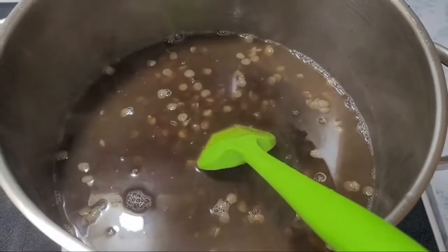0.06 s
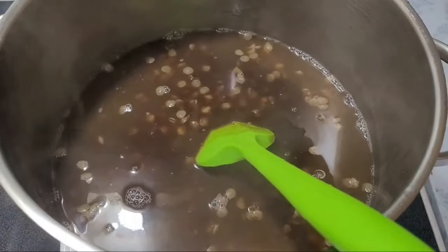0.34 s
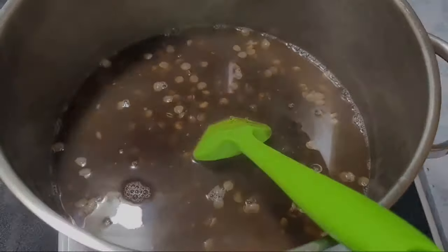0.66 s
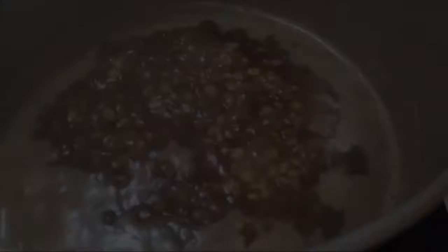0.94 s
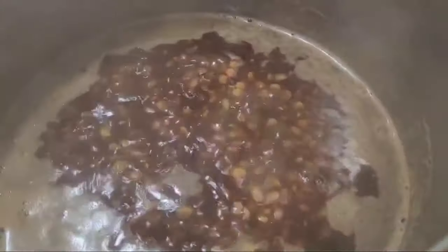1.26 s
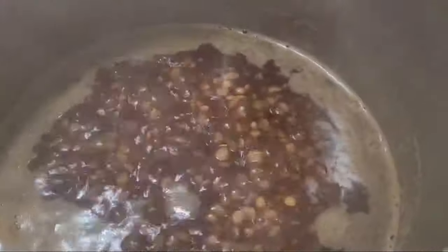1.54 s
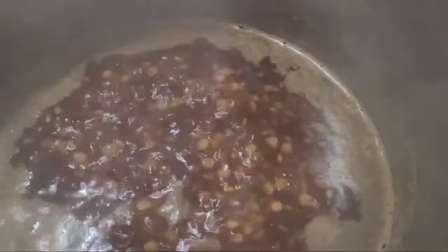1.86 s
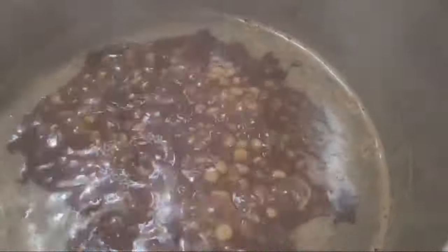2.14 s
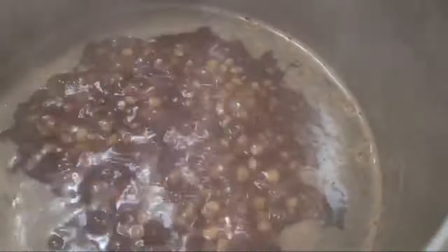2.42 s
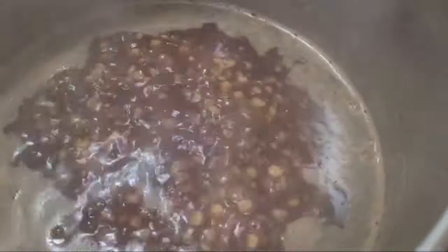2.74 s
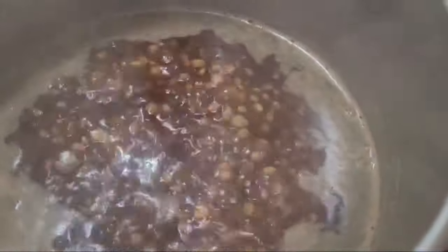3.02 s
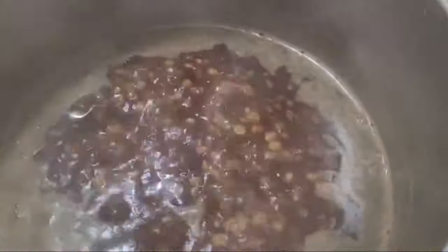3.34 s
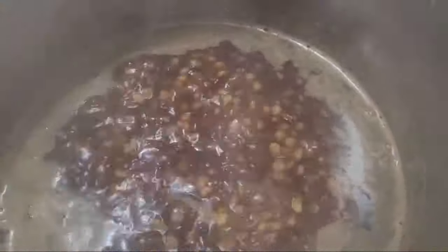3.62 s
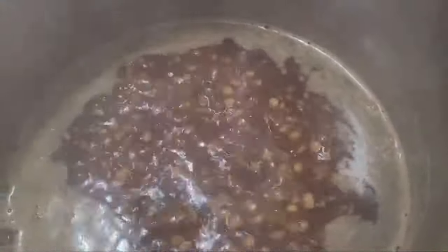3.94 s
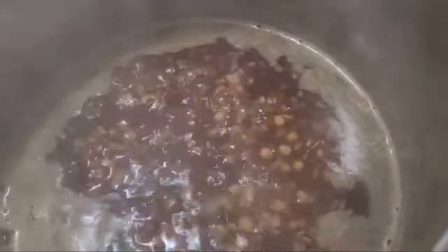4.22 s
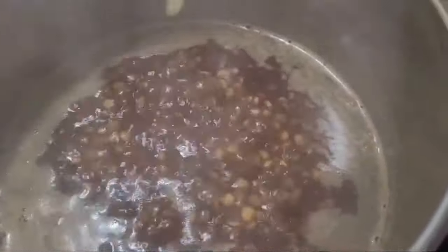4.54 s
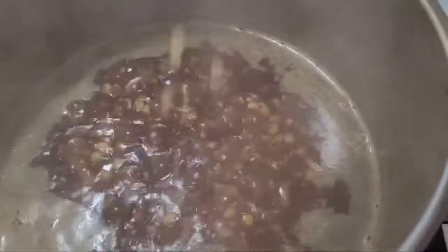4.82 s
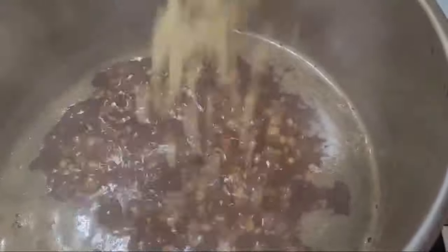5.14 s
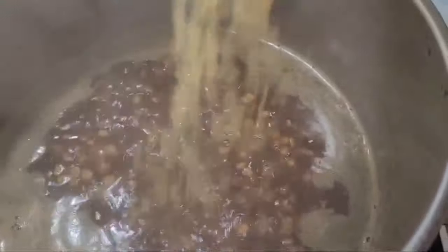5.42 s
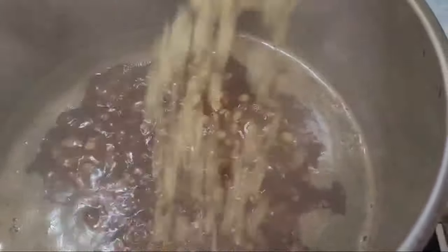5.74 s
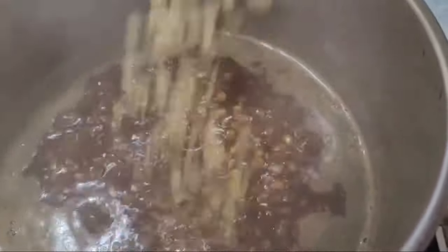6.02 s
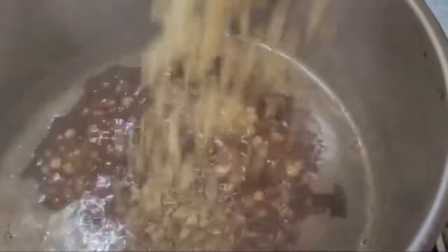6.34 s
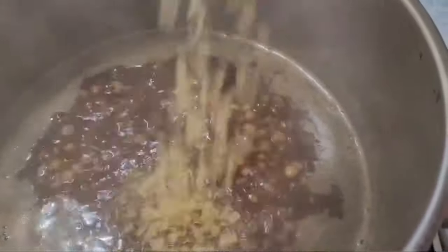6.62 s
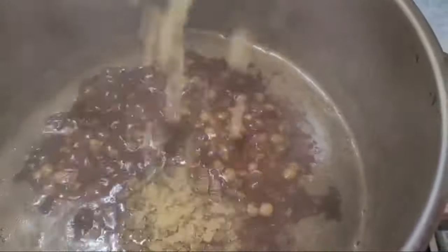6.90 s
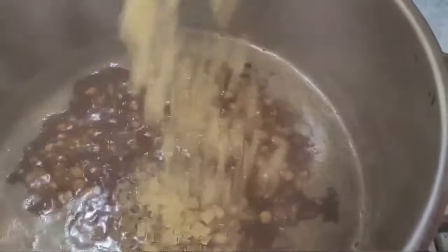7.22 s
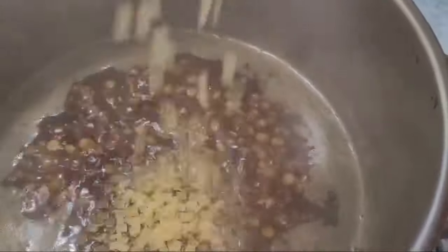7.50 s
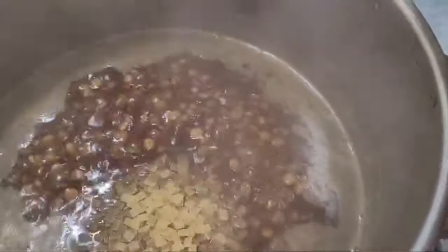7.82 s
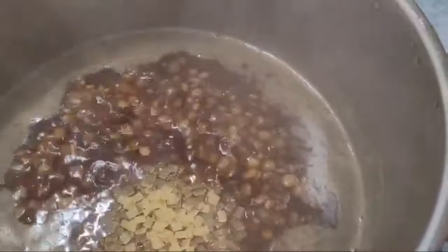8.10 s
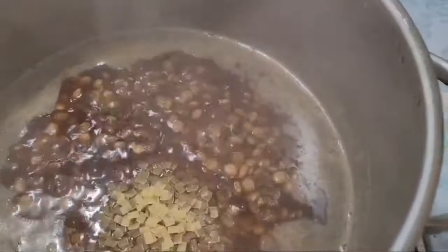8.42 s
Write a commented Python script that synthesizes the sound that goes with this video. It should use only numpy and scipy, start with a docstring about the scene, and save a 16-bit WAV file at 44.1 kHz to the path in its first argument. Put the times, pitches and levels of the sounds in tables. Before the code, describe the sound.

It begins very quietly with the low rush of a kitchen burner and one faint rustle, then drops to silence at about 0.6 seconds. From 1 second, lentil soup boils thickly in a deep steel pot, heard close above the rim in stereo. Irregular plops, small snaps and gurgles ring hollowly in the pot over a low rumble and continue throughout. Two short knocks on the steel come at about 2.2 and 2.4 seconds, the first sharper. Soup spits faintly on the hot wall near 1.6 and 3 seconds. From about 3.7 seconds dry pasta slides softly in its packet with scattered ticks. At 5 seconds it pours in with a bright, surging hiss of tiny collisions, single pieces clicking on the steel. The pour thins after 7.3 seconds and trickles out by 7.9, leaving the bubbling and a light sizzle until about 8.5 seconds.

```python
"""Lentil soup boiling in a deep steel pot on a kitchen stove, stereo microphone just above the rim.
After a quiet moment and a short silence, bubbles burst thickly and ring the air in the pot.
Soup sizzles on the hot wall and the steel is knocked twice. Dry pasta slides in its packet,
pours in with a hissy rush of tiny collisions, and trickles out. The burner rushes low underneath."""
import sys
import numpy as np
from scipy import signal
from scipy.fft import rfft, irfft
from scipy.io import wavfile
from scipy.ndimage import uniform_filter1d

SR = 44100
rng = np.random.default_rng(int(sys.argv[2]) if len(sys.argv) > 2 else 0)


def unload_audio(sound):
    """Save the sound as a 16-bit wav file, at the path given as the first command line argument."""
    columns = np.transpose(np.atleast_2d(sound))
    # keep every value between -1 and 1, then stretch to whole-number steps
    steps = np.round(np.clip(columns, -1, 1) * 32767)
    wavfile.write(sys.argv[1], SR, steps.astype(np.int16))


N = 373086
T = np.arange(N) / SR

# Levels in the tables are relative, ahead of the filters and the microphone.
# the biggest bursts: (time [s], plop level [dB], plop pitch [Hz], film snap level [dB])
BIG_BURSTS = [(1.039, -45, 640, -45), (1.084, -40, 600, -44), (1.24, -30.5, 874, -42),
              (1.451, -31.5, 660, -52), (1.524, -34.5, 765, -40.5), (1.627, -33.5, 634, -32.5),
              (1.652, -24, 685, -37.5), (1.729, -29, 616, -49), (1.792, -29.5, 468, -64),
              (1.812, -39, 504, -56), (1.925, -22.5, 660, -59), (1.935, -31, 900, -55),
              (2.053, -32, 556, -51), (1.972, -22.5, 600, -36.5), (2.102, -33, 630, -35.5),
              (2.193, -27.5, 780, -34), (2.243, -26, 483, -41), (2.307, -30.5, 590, -50),
              (2.318, -29.5, 616, -29), (2.35, -33, 700, -39), (2.382, -23.5, 684, -44),
              (2.51, -30, 534, -65), (2.524, -20, 680, -44), (2.547, -38, 845, -43),
              (2.574, -23, 794, -30.5), (2.842, -34.5, 834, -49), (3.058, -36, 880, -44.5),
              (3.124, -29, 734, -46), (3.142, -32.5, 577, -39), (3.171, -34, 870, -34.5),
              (3.388, -26, 603, -41), (3.402, -23.5, 850, -37), (3.444, -35, 580, -46),
              (3.529, -26, 785, -32.5), (3.722, -30.5, 507, -70), (3.747, -30, 544, -58),
              (3.899, -36, 630, -64), (3.92, -32, 460, -63), (4.033, -30, 490, -70),
              (4.112, -19.5, 840, -33.5), (4.136, -30, 686, -52), (4.175, -29.5, 646, -31.5),
              (4.267, -30.5, 514, -53), (4.307, -25.5, 706, -56), (4.428, -35, 730, -56),
              (4.452, -53, 1100, -41), (4.55, -32, 660, -34), (4.63, -40, 900, -47),
              (4.71, -25.5, 750, -55), (4.74, -28.5, 553, -42), (4.844, -42, 1110, -43),
              (4.863, -36, 800, -46), (4.89, -29, 770, -32), (4.916, -27, 585, -50), (4.931, -32, 623, -44),
              (4.964, -29.5, 620, -46), (5.02, -21, 765, -28.5), (5.074, -28.5, 494, -33.5),
              (5.188, -31.5, 590, -32), (5.207, -31, 800, -37), (5.226, -38, 600, -34),
              (5.333, -25.5, 644, -57), (5.39, -35, 1130, -33), (5.438, -33, 620, -38),
              (5.737, -38, 724, -32.5), (5.751, -29, 520, -44), (5.788, -29.5, 870, -24.5),
              (5.809, -27, 664, -52), (5.83, -32, 750, -45), (5.9, -29, 885, -43), (5.933, -34, 730, -41),
              (6.114, -30.5, 465, -39), (6.12, -31.5, 740, -37), (6.176, -32, 1120, -39),
              (6.382, -25.5, 724, -61), (6.589, -37, 483, -56), (6.694, -27.5, 635, -41.5),
              (6.736, -34, 570, -53), (6.748, -29.5, 710, -57), (6.94, -35.5, 790, -42.5),
              (7.007, -27.5, 560, -44), (7.059, -35, 690, -45), (7.111, -24.5, 750, -48),
              (7.115, -21, 700, -40), (7.369, -19.5, 780, -29), (7.4975, -32, 780, -52),
              (7.503, -27, 1390, -34), (7.522, -32, 513, -52), (7.596, -29.5, 560, -40.5),
              (7.706, -34, 910, -71), (7.81, -30, 600, -50), (7.89, -27, 740, -45),
              (7.964, -36, 600, -42.5), (8.029, -30.5, 614, -36), (8.06, -24, 800, -71),
              (8.132, -30.5, 543, -40.5), (8.206, -29, 620, -49), (8.215, -29, 730, -28),
              (8.373, -28.5, 700, -62), (8.399, -30, 506, -61), (8.45, -30.5, 756, -28.5)]
# strength of the boil, which builds up and then holds: (time [s], level [dB])
BOIL_LEVEL = [(0, -75.5), (.9, -73), (.98, -49.5), (1.17, -51.5), (1.6, -46.5), (3.6, -46.5), (5.3, -43.5),
              (7.4, -45.5), (7.85, -48), (8.46, -45.5)]
# rumble of the heaving soup: (frequency [Hz], level [dB])
RUMBLE_COLOUR = [(25, -18), (45, -12), (62, 0.5), (80, -3.5), (115, -7.5), (160, -10), (200, -20.5),
                 (300, -21), (600, -35), (3000, -98)]
# modes of the air in the pot: (frequency [Hz], level over the direct sound [dB], t60 [s])
AIR_MODES = [(119.1, 9, 0.27), (156.3, 3.5, 0.082), (282.3, 5.5, 0.075), (311.8, 1.5, 0.073),
             (408, 2, 0.066), (458.4, 2, 0.035), (511.5, 6, 0.055), (640, -2, 0.069), (1109, 3.5, 0.04),
             (1444, -1.5, 0.029), (1640, 2.5, 0.055), (2010, 5.5, 0.06)]
# hollows between those modes: (frequency [Hz], level [dB])
POT_HOLLOWS = [(155, -0.5), (195, -2), (250, 3.5), (305, 0), (345, -3.5), (400, 2), (650, -2.5), (830, -3),
               (1100, -1), (2300, 3.5), (3100, 13)]
# pasta slides, pours in surges, slackens, pours again and trickles out: (time [s], level [dB])
PASTA_FLOW = [(3.68, -59), (3.77, -67), (4.0, -68), (4.14, -57), (4.29, -62), (4.34, -64.5), (4.43, -59),
              (4.68, -62), (4.8, -56), (4.96, -56), (5.02, -42), (5.15, -39), (5.19, -45), (5.27, -39.5),
              (5.44, -38), (5.485, -44), (5.53, -33), (5.6, -42), (5.645, -37.5), (5.69, -43), (5.77, -38),
              (5.88, -39.5), (5.95, -34), (6.16, -38), (6.3, -36.5), (6.39, -34), (6.47, -46.5),
              (6.62, -43), (6.83, -48.5), (6.885, -36.5), (6.93, -43.5), (7.01, -36), (7.13, -39),
              (7.17, -33), (7.23, -41), (7.3, -40.5), (7.42, -53.5), (7.54, -49), (7.68, -53.5),
              (7.73, -59.5), (7.88, -74)]
# hiss of the pasta stream: (frequency [Hz], level [dB])
RUSH_COLOUR = [(2000, -14), (3200, -39.5), (4200, 8), (5000, 0), (5600, 5), (7400, -12), (8800, 7.5),
               (10000, 12.5), (11300, 13.5), (13000, 14), (15500, 13.5)]
# clatter of scattered pieces: (frequency [Hz], level [dB])
CLATTER_COLOUR = [(600, -12), (1300, -9), (1750, -11), (2010, -4), (2300, -6), (3150, -3), (3700, 9),
                  (4150, 13.5), (4750, 11), (4980, 14), (5600, 6), (6000, 8), (7400, 13), (9000, 0),
                  (15000, -25)]
# a light touch and two knocks on the pot: (time [s], level [dB], contact time [ms])
POT_KNOCKS = [(.587, -46, .4), (2.1985, -14, 0.013), (2.362, -18, 0.2)]
# modes of the steel wall: (frequency [Hz], level [dB], t60 [s])
STEEL_MODES = [(442, 2, 0.053), (1100, -19, 0.036), (1280, -14, 0.07), (1965, -7, 0.055),
               (2062, -10.5, 0.08), (2230, -7, .035), (2387, -6, 0.06), (2600, -11, .035), (3130, -3, .03),
               (3420, -8, 0.03), (3607, -5, .05), (3715, 1, 0.065), (4250, -10, 0.06), (5880, -2, 0.05),
               (6480, 1, 0.035), (6640, -3, .035), (6850, -4, 0.03), (7560, -10, .045), (7740, -4, 0.06),
               (10370, -17, .06), (10750, -14, 0.06), (11250, -20, .05), (11980, -22, 0.05)]
# droplets, a hard touch and single pasta pieces on the steel: (time [s], level [dB])
STEEL_TICKS = [(1.432, -62), (1.695, -58), (1.763, -63), (1.835, -56), (1.853, -54), (2.198, -35),
               (2.319, -54), (2.935, -60), (3.163, -59), (3.283, -56), (3.303, -65), (3.575, -60),
               (3.737, -55), (3.8005, -51), (3.816, -53), (3.9145, -53), (4.062, -46), (4.1385, -45),
               (4.302, -36.5), (4.5195, -35), (4.674, -49), (4.7795, -37), (4.8147, -42), (4.9337, -36),
               (4.975, -33), (5.035, -23), (5.132, -28), (5.558, -26), (5.645, -27), (5.764, -26),
               (5.799, -26), (6.11, -26), (6.5524, -29), (6.6564, -32), (6.7147, -28), (6.7887, -30),
               (7.113, -29), (7.258, -30), (7.2984, -28), (7.335, -31), (7.4577, -33), (7.4926, -36),
               (7.536, -30), (7.568, -31), (7.58, -32), (7.673, -39), (7.829, -50), (8.0214, -54),
               (8.215, -44), (8.237, -53)]
# spurts where soup wets the hot wall: (crest time [s], level [dB], swell time [s])
SIZZLE_SPURTS = [(1.45, -68, 0.046), (1.65, -56.5, 0.02), (2.86, -72, 0.12), (3.07, -61, 0.23),
                 (3.17, -55.5, 0.043), (7.99, -62, 0.12), (8.16, -59, 0.0063)]
# spitting on the hot wall: (frequency [Hz], level [dB])
SPIT_COLOUR = [(2000, -20), (3300, -6), (4300, 0), (4800, -5), (5400, -13), (7200, -15), (9500, -28),
               (15000, -32)]
# soft puffs of fine spray: (crest time [s], level [dB], swell time [s])
SPRAY_PUFFS = [(1.06, -77, 0.051), (1.44, -68, 0.024), (1.64, -84, 0.017), (1.975, -61, 0.023),
               (2.11, -83, 0.017), (2.52, -67, 0.39), (8.22, -54, 0.011)]
# hiss of that spray: (frequency [Hz], level [dB])
MIST_COLOUR = [(1500, -8), (2800, -2), (3800, 0), (5000, -5), (7200, -3), (9000, -16), (11000, -15),
               (15000, -18)]
# rush of the burner under the pot: (frequency [Hz], level [dB])
BURNER_COLOUR = [(25, -9), (60, -5.5), (110, 1), (190, -11.5), (275, 6), (400, -4.5), (700, -13.5),
                 (1100, -29.5), (2000, -44.5), (4500, -35), (6700, -32), (8500, -36), (15000, -47)]
# response of the two microphone ports: (frequency [Hz], left level [dB], right level [dB])
MIC_PORTS = [(47.3, 0.5, -5), (202, 0.5, -3.5), (470, -1.7, -4.5), (1097, 9, 4.5), (1700, 6.5, -9.5),
             (2140, 9.5, 3), (3420, -2, -1.5), (4400, -4.5, -8), (4970, -9, -4), (8260, -3.5, -4.5),
             (8700, -5, -4), (11650, 2, 0.5), (15500, 0.5, 0)]

CREST_S = .012  # from the start of a bubble's sound to its crest


def soup():
    """The main source, just below the microphone: every bubble sounds through the air in the pot."""
    surface = bursts(BIG_BURSTS) + bursts(middling_bursts()) + boil()
    return pot(colour(undb(-2) * surface, POT_HOLLOWS))


def bubble(hz, cycles, swell, glide):
    """A cavity opens in about a cycle, rings briefly and rises in pitch."""
    turns = (T[:SR // 25] - CREST_S) * hz
    opening = -(turns / swell) ** 2
    dying = -turns * np.tanh(3 * turns) / cycles
    envelope = np.exp(np.where(turns < 0, opening, dying))
    return envelope * np.cos(2 * np.pi * turns * (1 + glide * np.tanh(turns / 4)))


def bursts(rows, snap_hz=1580, tear_gap_s=.0031, flurry_s=.01047, flurry_db=-16.5):
    """A low plop, higher snaps as the film tears in steps, and small neighbours set off around it."""
    out = np.zeros((2, N))
    for s, db, hz, snap_db in rows:
        (length, place, _), tears, neighbours = rng.uniform(-1.098, 1, (3, 3))
        start = s - CREST_S
        plop = bubble(hz, cycles=.75 * (1 + .4 * length), swell=.72, glide=.04)
        add(out, start, undb(db - 1.4) * placed(plop, place))
        for k, tear in enumerate(tears):
            snap = bubble(snap_hz * (1 + .25 * tear), cycles=1.1, swell=1.18, glide=.037)
            delay = k * tear_gap_s * (1 + tear / 2)
            add(out, start + delay, undb(snap_db - 2 - 5 * k) * placed(snap, place))
        for order, scatter in zip((-1.25, -.75, .9), neighbours):
            small = bubble(hz * 2 ** (.5 * scatter - .25), cycles=.8, swell=.8, glide=.08)
            offset = flurry_s * (order + scatter / 4)
            add(out, start + offset, undb(db + flurry_db) * placed(small, -place))
    return out


def middling_bursts(per_s=4, centre_hz=595, from_s=.97):
    """Middling bubbles at loosely even intervals, following the boil's level; columns as BIG_BURSTS."""
    count = int(per_s * N / SR)
    when, size, pitch, snap = rng.uniform(-1, 1, (count, 4)).T
    s = (np.arange(count) + (1 + when) / 2) / per_s
    plop_db = np.interp(s, *np.array(BOIL_LEVEL).T) + 8.5 + 2 * size
    snap_db = plop_db - 13 + 9 * snap
    rows = np.column_stack([s, plop_db, centre_hz * 2 ** (.3 * pitch), snap_db])
    return rows[s > from_s]


def simmer(rate, centre_hz, octaves, spread_db, cycles):
    """A crowd of small bubbles all over the surface; the rare high and low ones are a little louder."""
    out = np.zeros((2, N))
    for when, pitch, size, length, place in rng.random((int(rate * N / SR), 5)):
        octave = octaves * np.clip(np.log(pitch / (1 - pitch)) / np.sqrt(3), -2, 2)
        db = spread_db * min(-np.log(size), 3.6) + 2 * abs(octave)
        sound = bubble(centre_hz * 2 ** octave, cycles=cycles * (.5 + length), swell=.65, glide=.06)
        add(out, when * N / SR - CREST_S, undb(db) * placed(sound, 2 * place - 1, width_db=1))
    return unit(out)


def boil():
    """Gurgles, smaller dry blips and the rumble of the heaving soup share one strength."""
    gurgles = undb(-5.3) * simmer(rate=300, centre_hz=465, octaves=.36, spread_db=1.9, cycles=.75)
    blips = undb(-20) * simmer(rate=420, centre_hz=1400, octaves=.42, spread_db=0, cycles=1.3)
    heave = clicks(rate=230, spread_db=3) * rng.standard_normal(N) + .099 * rng.standard_normal((2, N))
    rumble = undb(-12.3) * unit(colour(heave, RUMBLE_COLOUR))
    return undb(curve(BOIL_LEVEL)) * (gurgles + blips + rumble)


def pot(x, spots=6, heaves_per_s=22):
    """As the surface heaves, bursts come from changing spots, and each rings the pot in its own way."""
    spot = rng.integers(0, spots, N)[(T * heaves_per_s).astype(int)]
    shares = (uniform_filter1d(1. * (spot == k), size=256) for k in range(spots))
    return sum(ring(x * share, pot_response()) for share in shares)


def pot_response(mode_shift=.03, mode_scatter_db=3.5):
    """From one spot to the microphone: direct sound, air modes, wall echoes and a kitchen tail."""
    t = T[:SR // 3]
    response = np.zeros((2, len(t)))
    response[:, 0] = 1
    for hz, db, t60 in AIR_MODES:
        shift, favour = rng.uniform(-1.35, 1, 2)
        # cross modes depend on the spot and reach the ports out of step; the low ones arrive alike
        cross = min(hz / 1000, 1)
        skew = np.array([[.5], [-.5]]) * min((hz / 1050) ** 2, 1.8)
        tone = np.cos(2 * np.pi * hz * (1 + mode_shift * cross * shift) * t + skew)
        gain = undb(db + mode_scatter_db * cross * favour) * 2 * np.log(1000) / (t60 * SR)
        response += gain * fade(t, t60) * tone
    for db, t60 in ((-4.5, .023), (-9, .24)):  # pot walls, then kitchen
        mid, side = rng.standard_normal((2, len(t)))
        side = signal.lfilter(*signal.butter(2, 1000, "high", fs=SR), side)
        tail = (mid + np.array([side, -side])) * fade(t, t60) * np.minimum(t / .00067, 1)
        response += undb(db) * unit(tail) / np.sqrt(len(t))
    return response


def pasta(pour_s=5.22, full_flow_db=-43, clumps_per_s=40):
    """Hard little pieces slide in the packet, then fall in clumps, colliding more in a stronger flow."""
    flow_db = curve(PASTA_FLOW) + .9 * (T > pour_s) * wander(clumps_per_s)
    over_full_db = flow_db - full_flow_db
    flowing = np.interp(T, [3.7, 3.78, 7.8, 7.95], [0, 1, 1, 0])
    falling = np.interp(T, [4.7, 5, 7.5, 7.7], [.16, .7, .7, .25])
    slide_rate = 450 + 1500 * undb((flow_db + 50) / 2)
    collision_rate = 560 * undb(.8 * over_full_db)
    sliding = grains(slide_rate, spread_db=.5, t60=.0042, tail_db=9, tail_t60=.096)
    collisions = grains(collision_rate, spread_db=2.2, t60=.007, tail_db=-12, tail_t60=.04)
    contacts = np.sqrt(1 - falling) * sliding + np.sqrt(falling) * collisions
    rush = undb(4) * unit(colour(contacts, RUSH_COLOUR))
    wall, rim = pasta_on_steel(slide_rate / 4, pour_s)
    rattle = contacts + undb(-7) * np.sqrt(2 * falling) * chinks()
    clatter = undb(4) * unit(colour(rattle, CLATTER_COLOUR)) + wall
    # clatter gives way to hiss in a full stream and as a soft heap builds up
    clatter_db = -1 - .17 * over_full_db - 2.5 * np.maximum(T - pour_s, 0)
    return flowing * undb(flow_db) * (rush + rim + undb(clatter_db) * clatter)


def pasta_on_steel(rate, pour_s, tunings=4):
    """Pieces strike the wall; before the pour, sliding rings the rim that the packet rests on."""
    strikes = np.zeros((2, N))
    for _ in range(tunings):  # soup damps the wall unevenly, so pieces ring it a little differently
        hits = clicks(rate / tunings, spread_db=0) * rng.standard_normal(N)
        strikes += ring(hits, steel(T[:SR // 12], detune=.011))
    wall = colour(strikes, [(500, -28), (1400, 0), (2000, 2), (3100, -9), (3700, -5), (4200, 4),
                            (12000, 9.5)])
    rim = colour(strikes, [(500, -40), (3000, -12), (3700, -3), (5000, -1), (5900, 3), (6600, -3),
                           (12000, 3)])
    resting = np.clip((pour_s - T) * 10, 0, 1)
    return undb(-6) * unit(wall), undb(-7.5) * resting * unit(rim)


def chinks(per_s=1000, centre_hz=5200, octaves=1.3, t60=.011):
    """Dry rattle: each hard piece rings briefly at its own pitch and reaches the ports out of step."""
    out, t = np.zeros((2, N)), T[:SR // 50]
    for when, pitch, size, length, left, right in rng.random((int(per_s * N / SR), 6)):
        hz = centre_hz * 2 ** (octaves * (2 * pitch - 1))
        tone = np.sqrt(hz) * np.sin(2 * np.pi * (hz * t + np.array([[left], [right]])))
        add(out, when * N / SR, undb(-9 * size) * tone * fade(t, t60 * (.5 + length)))
    return unit(out)


def knocks():
    """A short crack, the soup-damped ring of the steel and a kitchen tail; longer contact is duller."""
    out, t = np.zeros((2, N)), T[:SR // 3]
    crack_band = signal.butter(10, [1200, 7800], "band", fs=SR, output="sos")
    tail_band = signal.butter(2, [1000, 4000], "band", fs=SR, output="sos")
    for s, db, contact_ms in POT_KNOCKS:
        crack = signal.sosfilt(crack_band, rng.standard_normal((2, len(t))))
        crack *= .42 * fade(t, .034) + .1 * fade(t, .2)
        tail = .09 * signal.sosfilt(tail_band, rng.standard_normal((2, len(t)))) * fade(t, .3)
        clang = .37 * steel(t) * np.minimum(t / .0008, 1)
        soft = np.exp(-1000 * np.pi / (contact_ms * SR))
        add(out, s, undb(db) * signal.lfilter([1 - soft], [1, -soft], clang + crack + tail))
    return out


def steel(t, detune=0):
    """The ring of the pot wall; high modes reach the two ports out of step."""
    out = np.zeros((2, len(t)))
    for hz, db, t60 in STEEL_MODES:
        pitch = hz * (1 + detune * rng.standard_normal())
        phase = rng.random((2, 1)) * min(hz / 4000, 1)
        out += undb(db) * fade(t, t60) * np.sin(2 * np.pi * (pitch * t + phase))
    return out


def ticks():
    """Single bright ticks with a short echo off the steel."""
    out, t = np.zeros((2, N)), T[:SR // 20]
    envelope = fade(t, .004) + undb(-11) * fade(t, .043)
    for s, db in STEEL_TICKS:
        add(out, s, undb(db - 4) * rng.standard_normal((2, len(t))) * envelope)
    return colour(out, [(800, -27), (3000, 0), (7000, 9.5), (12000, 7), (16000, 8)])


def sizzle():
    """Spurts of dense spitting where soup wets the hot wall."""
    fizz = grains(rate=290, spread_db=6.5, t60=.0065, tail_db=-5, tail_t60=.18)
    return swells(SIZZLE_SPURTS, t60=.23) * unit(colour(fizz, SPIT_COLOUR))


def spray():
    """A soft mist of fine spray follows the boil and also comes in puffs."""
    mist = grains(rate=500, spread_db=3.3, t60=.004, tail_db=-6, tail_t60=.085)
    steady = undb(curve(BOIL_LEVEL) - 26 + .71 * wander(2.4))
    return (steady + swells(SPRAY_PUFFS, t60=.13)) * unit(colour(mist, MIST_COLOUR))


def burner():
    """The low steady rush of the burner under the pot."""
    air = rng.standard_normal(N) + 1.33 * rng.standard_normal((2, N))
    return undb(-60.5) * unit(colour(air, BURNER_COLOUR))


def rustle():
    """One faint, brief rustle just before the silence."""
    shape = [(100, 4), (450, 0), (1300, -7), (3000, -27), (7000, -6), (9000, -32)]
    brief = np.interp(T, [.578, .586, .61, .62], [0, 1, 1, 0])
    return undb(-62) * brief * unit(colour(rng.standard_normal((2, N)), shape))


def clicks(rate, spread_db):
    """Random clicks of uneven size, at rate per second, with unit power."""
    hit = rng.random(N) < rate / SR
    size = undb(spread_db * np.minimum(rng.exponential(size=N), 4))
    return unit(hit * size / np.sqrt(rate))


def grains(rate, spread_db, t60, tail_db, tail_t60):
    """Tiny noise bursts, each with a short echo off the steel, different at each port."""
    t = T[:SR // 8]
    envelope = fade(t, t60) + undb(tail_db) * fade(t, tail_t60)
    power = ring(clicks(rate, spread_db) ** 2, envelope ** 2)
    return unit(np.sqrt(np.maximum(power, 0)) * rng.standard_normal((2, N)))


def swells(rows, t60):
    """Gain of spurts that swell to a crest and dry off."""
    return sum(undb(db) * np.exp(np.minimum(T - s, 0) / swell_s) * fade(np.maximum(T - s, 0), t60)
               for s, db, swell_s in rows)


def placed(sound, place, width_db=3):
    """Spread a sound over the two ports by its place across the pot, about -1 to 1."""
    return undb(width_db * place * np.array([[1], [-1]])) * sound


def wander(rate):
    """Random drift with a spread near 1, turning rate times a second."""
    count = int(rate * N / SR) + 2
    return 1.4 * np.interp(T * rate, np.arange(count), rng.standard_normal(count))


def colour(x, points, column=1, size=4096):
    """Minimum-phase filter shaped by points: (frequency [Hz], level [dB])."""
    points = np.array(points)
    hz = np.maximum(np.arange(size // 2 + 1) * SR / size, 1)
    db = np.interp(np.log(hz), np.log(points[:, 0]), points[:, column])
    cepstrum = irfft(np.log(undb(db)))
    cepstrum[1:size // 2] *= 2
    cepstrum[size // 2 + 1:] = 0
    return ring(x, irfft(np.exp(rfft(cepstrum))))


def ring(x, response):
    """Pass a sound through an impulse response."""
    return signal.fftconvolve(np.atleast_2d(x), np.atleast_2d(response), axes=-1)[:, :N]


def add(track, s, sound):
    """Mix a sound into a track at s seconds."""
    i = max(int(s * SR), 0)
    part = track[..., i:i + sound.shape[-1]]
    part += sound[..., :part.shape[-1]]


def curve(rows):
    """Join points with straight lines: (time [s], level [dB])."""
    return np.interp(T, *np.array(rows).T)


def fade(t, t60):
    """Exponential decay, 60 dB in t60 seconds."""
    return np.exp(-np.log(1000) * t / t60)


def undb(db):
    """Decibels to gain."""
    return 10 ** (np.asarray(db) / 20)


def unit(x):
    """Scale to rms 1."""
    return x / np.sqrt(np.mean(x ** 2))


def scene():
    """At the rim: the bubbles sound through the pot, and the rest reaches the microphone directly."""
    return soup() + pasta() + ticks() + knocks() + sizzle() + spray() + burner() + rustle()


def record(dry, silence_s=(.614, .97), top_hz=15900):
    """Each microphone port has its own colour; the sound stops for a moment; the top treble is cut."""
    left = np.roll(dry[0], 3)  # the left port lies a little further off
    ported = np.vstack([colour(left, MIC_PORTS, column=1), colour(dry[1], MIC_PORTS, column=2)])
    audible = uniform_filter1d(1. * ((T < silence_s[0]) | (T > silence_s[1])), size=64)
    top_cut = signal.ellip(10, .2, 80, top_hz, fs=SR, output="sos")
    return signal.sosfilt(top_cut, ported * audible)


dry = scene()
out = record(dry)
unload_audio(out)
```